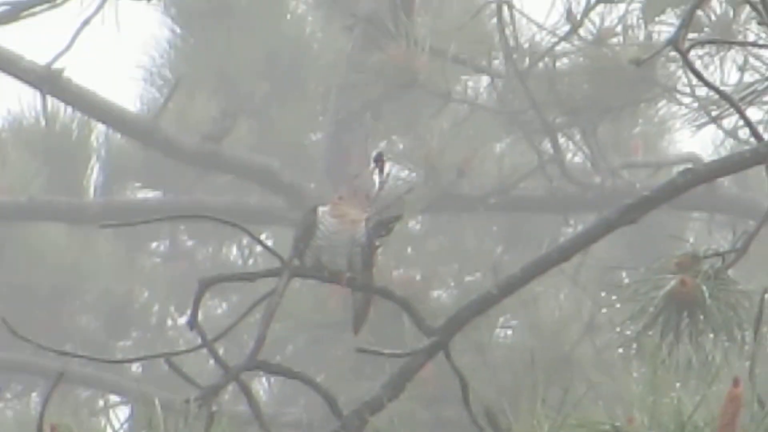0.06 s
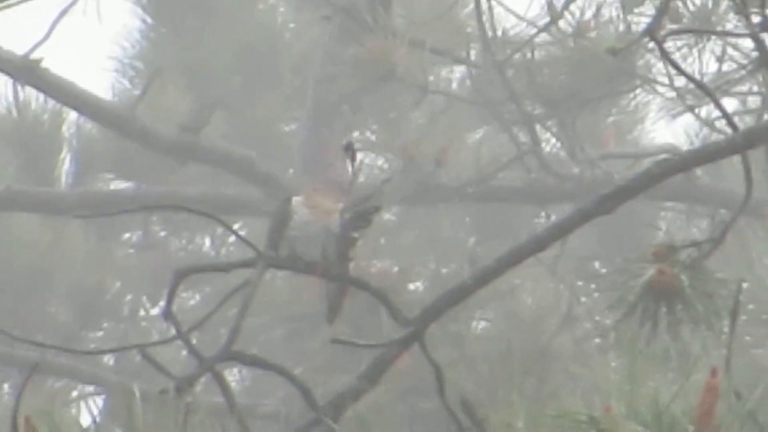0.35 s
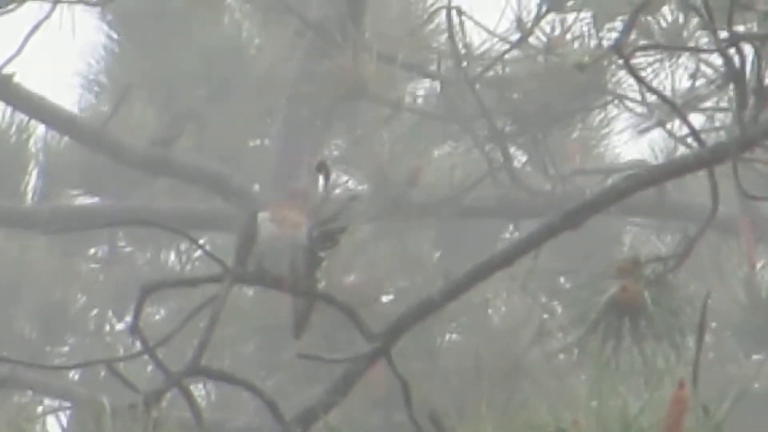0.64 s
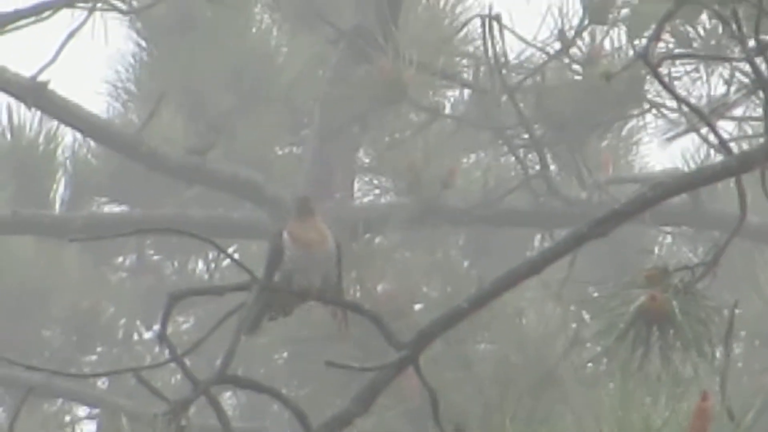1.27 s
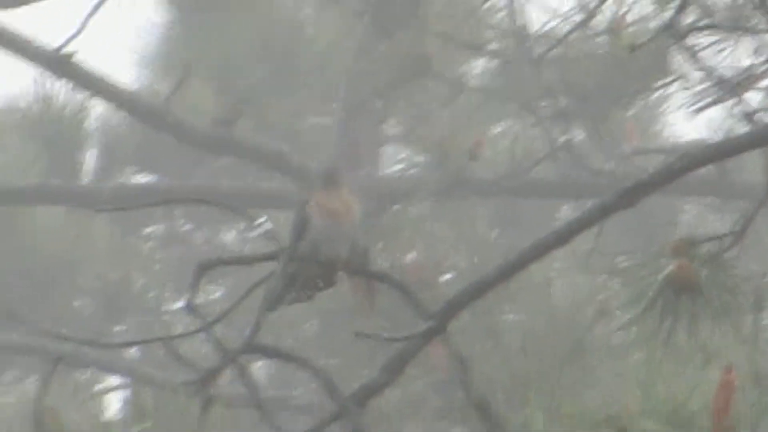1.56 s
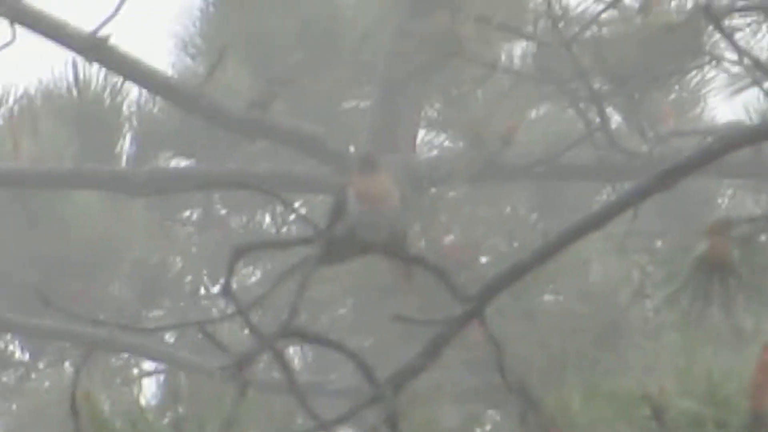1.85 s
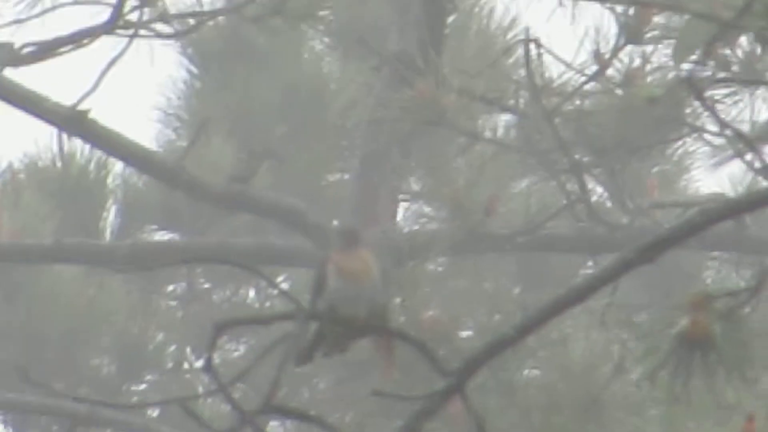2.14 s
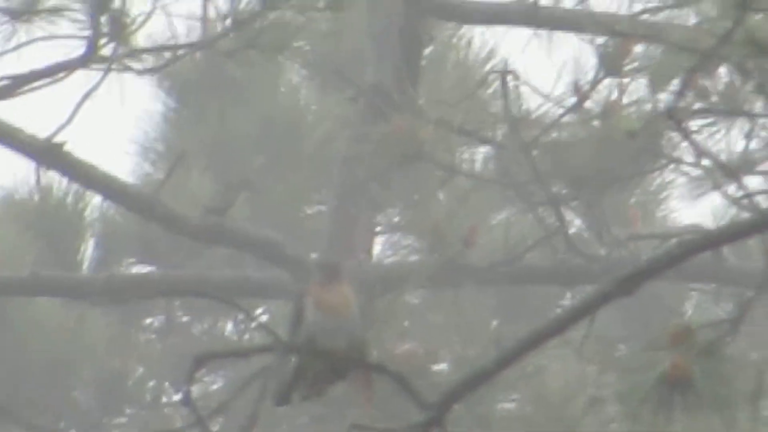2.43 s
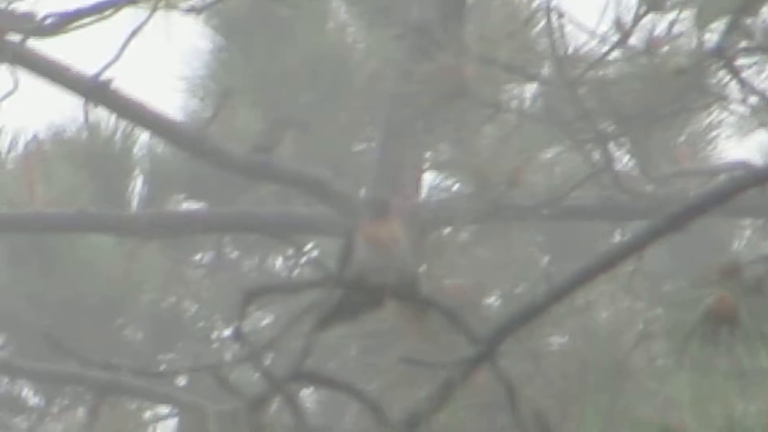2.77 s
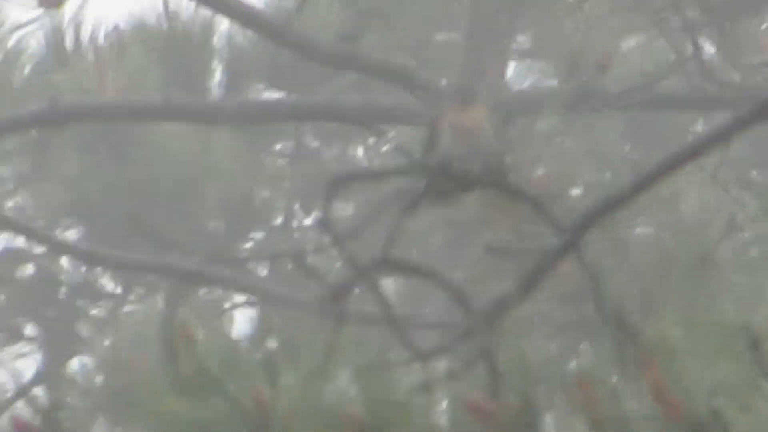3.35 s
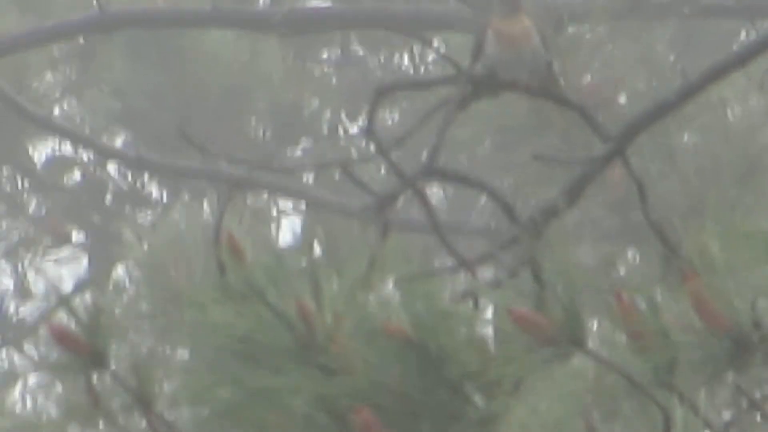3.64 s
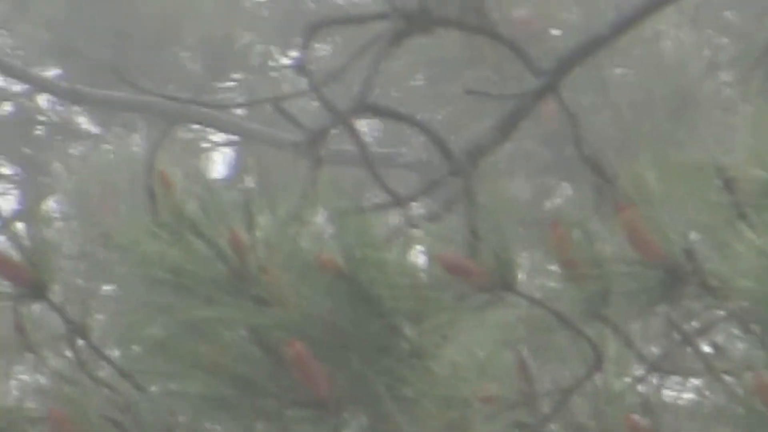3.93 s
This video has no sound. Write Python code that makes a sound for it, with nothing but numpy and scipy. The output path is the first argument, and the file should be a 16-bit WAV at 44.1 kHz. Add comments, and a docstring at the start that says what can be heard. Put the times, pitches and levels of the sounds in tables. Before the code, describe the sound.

Wind buffets the microphone with uneven low rumbles and thumps over a steady hiss in a pine forest. A cuckoo softly calls two notes, and a distant songbird chirps faintly. Near the end comes a sharp handling click, then another cuckoo note.

```python
"""Gusts buffet a camera's two microphone ports in opposite phase, over a hiss and the hollow rush of air.
Among misty pines a cuckoo calls softly in nearly pure tones: a short high note, a longer low one, and
later the start of the next call. A far songbird chirps, and the trees scatter both voices into a faint
tail. A few ticks pass, and one sharp handling click rings the camera's case and briefly ducks the gain."""
import sys
import numpy as np
from scipy import signal
from scipy.fft import rfft, irfft
from scipy.io import wavfile
from scipy.ndimage import uniform_filter1d

SR = 44100
rng = np.random.default_rng(int(sys.argv[2]) if len(sys.argv) > 2 else 0)


def put_to_file(sound):
    """Save the sound as 16-bit audio at rate SR, in the file named by the first command-line argument."""
    columns = np.atleast_2d(sound).T  # one column per channel
    safe = np.clip(columns, -1, 1)
    whole_steps = np.round(safe * 32767)
    wavfile.write(sys.argv[1], SR, whole_steps.astype(np.int16))


N = 176400
T = np.arange(N) / SR
HZ = np.fft.rfftfreq(N, 1 / SR)
CONTACT_S = 0.00047  # rise time of an impact


def amp(db):
    """Amplitude ratio of a level in decibels."""
    return 10 ** (np.asarray(db) / 20)


def unit_rms(x):
    """Normalisation to rms 1."""
    return x / np.sqrt(np.mean(x ** 2) + 1e-20)


def curve(points):
    """Interpolation of a table over log frequency."""
    hz, value = np.transpose(points)
    return np.interp(np.log(HZ + 1), np.log(hz + 1), value)


def add(mix, start, sound):
    """Superposition of a stereo sound on the mix, from a start in seconds."""
    part = mix[:, round(start * SR):][:, :sound.shape[1]]
    part += sound[:, :part.shape[1]]


def white():
    """Spectra of two uncorrelated white noises."""
    return rfft(rng.standard_normal((2, N)))


def coloured(spectra, db):
    """Spectral shaping into noise of rms 1."""
    return unit_rms(irfft(spectra * amp(db), N))


def drift(rate_hz):
    """Low-pass filtering of noise into two random curves of rms 1."""
    return unit_rms(irfft(white() * np.exp(-(HZ / rate_hz) ** 2), N))


def air():
    """Broadband noise swells slowly: an uncorrelated hiss and a hollow rush partly in antiphase."""
    # Each row: time in seconds, hiss level in dB, rush level in dB.
    levels = [(0, -59, -51.5), (.7, -55.5, -48), (1.15, -55, -48), (1.8, -52, -44), (2.6, -51, -44.5),
              (3.35, -49.5, -42), (4, -51.5, -43)]
    # Each row of both spectra: frequency in Hz, relative spectral density in dB.
    hiss_spectrum = [(100, -2), (1200, -3), (2000, -4), (3700, -3), (5000, -7), (7600, -8.5), (8200, -12),
                     (10000, -12.5), (12500, -18), (14000, -23), (15000, -36)]
    rush_spectrum = [(30, -16), (150, -5), (300, -3), (430, -6.5), (550, 0.5), (740, 1), (850, -2.5),
                     (1000, -9.5), (1400, -16), (2500, -25), (6000, -63)]
    # Each row: frequency in Hz, correlation between left and right.
    rush_correlation = [(60, -0.83), (290, -0.86), (640, -0.47), (1400, -0.38)]
    # Each row: frequency in Hz, left minus right level in dB.
    rush_balance = [(200, -1), (400, 0.5), (750, -4.5), (1300, 0.5)]
    times, hiss_db, rush_db = np.transpose(levels)
    left, independent = white()
    correlation = curve(rush_correlation)
    right = correlation * left + np.sqrt(1 - correlation ** 2) * independent
    pan_db = curve(rush_balance) * np.array([[.5], [-.5]])
    rush = coloured(np.array([left, right]), curve(rush_spectrum) + pan_db)
    hiss = coloured(white(), curve(hiss_spectrum))
    return amp(np.interp(T, times, hiss_db)) * hiss + amp(np.interp(T, times, rush_db)) * rush


def forest(sound):
    """Multiple scattering among the trees gives a diffuse, exponentially decaying reverberation."""
    level_db, t60_s, build_s = -13, .9, 0.043
    t = T[:SR]
    tail = rng.standard_normal((2, SR)) * np.exp(-np.log(1000) * t / t60_s) * np.minimum(t / build_s, 1)
    return amp(level_db) * signal.fftconvolve(sound, tail / np.linalg.norm(tail[0]), axes=1)[:, :N]


def songbird():
    """Frequency modulation: thin, distant whistles glide in pitch with a random waver."""
    # Each row: start in seconds, length in seconds, first and last pitch in Hz, level in dB.
    chirps = [(0.091, .045, 5330, 5550, -65), (.22, 0.063, 5200, 4930, -65), (.275, .07, 4350, 4750, -66),
              (1.692, .115, 4860, 5510, -63), (2.075, 0.1, 4900, 5360, -63)]
    out = np.zeros((2, N))
    waver_hz = 130 * drift(rate_hz=120)[0]
    for start, length, from_hz, to_hz, db in chirps:
        progress = np.linspace(0, 1, round(length * SR))
        hz = from_hz + (to_hz - from_hz) * progress + waver_hz[round(start * SR):][:len(progress)]
        whistle = np.sin(2 * np.pi * np.cumsum(hz) / SR)
        add(out, start, amp([[db], [db]]) * np.sin(np.pi * progress) * whistle)
    return out


def ticks():
    """Tiny impacts, perhaps drips from the needles, give quickly damped bursts of band noise."""
    # Each row: start in seconds, level in dB, centre frequency in Hz, decay time in seconds.
    taps = [(0.635, -47, 1830, 0.0061), (1.692, -39, 1420, 0.0043), (1.728, -44, 2800, .002),
            (2.4666, -35, 4200, .0016), (3.0936, -35.5, 1430, 0.0038), (3.198, -42, 1890, 0.0046)]
    half_width_octaves = 0.28
    out, t = np.zeros((2, N)), T[:SR // 10]
    for start, db, hz, decay in taps:
        band = 1 / (1 + (np.log2((HZ + 1) / hz) / half_width_octaves) ** 2)
        grain = unit_rms(irfft(white() * band, N))
        envelope = np.exp(-t / decay) * (1 - np.exp(-t / CONTACT_S))
        add(out, start, amp(db) * envelope * grain[:, :len(t)])
    return out


def wind():
    """Turbulence makes low pressure fluctuations, mostly in antiphase at the two ports."""
    # Each row: time in seconds, wind level in dB.
    gusts = [(0, -29.5), (.06, -17.5), (.13, -27.5), (.17, -26), (.34, -34.5), (.57, -32.5), (.62, -45),
             (.71, -38), (.77, -50), (.83, -22.5), (.9, -20), (.95, -28.5), (1.1, -36), (1.2, -31.5),
             (1.32, -44), (1.42, -28), (1.49, -25.5), (1.56, -29.5), (1.69, -18), (1.74, -39), (1.9, -33.5),
             (1.95, -17.5), (2.03, -26), (2.11, -28.5), (2.24, -29), (2.32, -22), (2.38, -44), (2.55, -48),
             (2.6, -30), (2.64, -34), (2.69, -24), (2.76, -16), (2.81, -29.5), (2.95, -31), (3.04, -20),
             (3.12, -26.5), (3.18, -46), (3.3, -46), (3.37, -23.5), (3.52, -47.5), (3.84, -48), (3.88, -32),
             (3.92, -43), (3.99, -20)]
    # Each row: frequency in Hz, relative spectral density in dB.
    spectrum = [(10, -7), (30, 1), (70, 0), (125, -8.5), (200, -23), (350, -31), (700, -54), (2000, -80)]
    common_db = -14.5
    flow = coloured(white(), curve(spectrum))
    local_rms = np.sqrt(uniform_filter1d(flow ** 2, size=2600, axis=1) + 0.026)
    opposed, common = amp(np.interp(T, *np.transpose(gusts))) * flow / local_rms
    return np.array([opposed, -opposed]) + amp(common_db) * common


def thumps():
    """A passing eddy is a pressure pulse flanked by suction, of opposite sign at the two ports."""
    # Each row: time in seconds, peak level at the left port in dB, width in seconds.
    eddies = [(.057, -11, 0.0024), (.079, -17.5, 0.0019), (0.125, -7, 0.0032), (0.384, -16, 0.0043),
              (0.865, -10.5, 0.0026), (0.896, -10, 0.0026), (0.911, -1.5, 0.0014), (1.481, -18.5, 0.0037),
              (1.619, -23, 0.0041), (1.696, -6, 0.0056), (1.935, -14.5, 0.0026), (1.997, -9, 0.0033),
              (2.072, -15, 0.004), (2.146, -8, 0.003), (2.303, -12.5, 0.0019), (2.695, -9, 0.0037),
              (2.756, -6.5, 0.0023), (2.883, -18, 0.0035), (3.363, -23, 0.0046), (3.968, -14.5, 0.0016)]
    tip_share, right_db = 0.45, -4
    out = np.zeros(N)
    for time, db, width in eddies:
        offset_sq = ((T - time) / width) ** 2
        rounded = (1 - offset_sq) * np.exp(-offset_sq / 2)
        sharp_tip = (1 - offset_sq) / (1 + offset_sq) ** 3
        out += amp(db) * ((1 - tip_share) * rounded + tip_share * sharp_tip)
    return out * np.array([[1], [-amp(right_db)]])


def click():
    """Impulse excitation: a hard snap and its rebound ring the damped modes of the camera's case."""
    # Each row: start in seconds, gain in dB.
    impacts = [(3.424, 1), (3.4263, -16.5)]
    # Each row: frequency in Hz, left and right relative level in dB, time to fall 60 dB in seconds.
    case_modes = [(135, -38, -32.5, 0.02), (376, -23, -17, .012), (750, -14, -13, 0.043),
                  (1410, -24, -13.5, 0.019), (2066, -8.5, -16, 0.014), (2350, -4.5, -7.5, 0.0099),
                  (2780, -16, -6, 0.011), (3402, -21.5, -7.5, 0.016), (5090, -31, -23.5, 0.018),
                  (5790, -20, -14, 0.0081), (6920, -25, -13, 0.008), (7960, -34, -14.5, 0.0083),
                  (8760, -31, -15.5, 0.0074)]
    rock_rad, rock_below_hz = 2.35, 1700  # low modes rock the case: the ports move against each other
    crack_db, crack_s, crack_hz = [[-15.5], [-12.5]], 0.0011, 8100
    out, t = np.zeros((2, N)), T[:SR // 10]
    ring = np.zeros((2, len(t)))
    for k, (hz, left_db, right_db, t60) in enumerate(case_modes):
        lag = np.array([[0], [rock_rad * (hz < rock_below_hz)]])
        envelope = amp([[left_db], [right_db]]) * np.exp(-np.log(1000) * t / t60)
        ring += (-1) ** k * envelope * np.sin(2 * np.pi * hz * t - lag)
    ring *= 1 - np.exp(-t / CONTACT_S)
    for start, db in impacts:
        grit = signal.lfilter(*signal.butter(2, crack_hz, fs=SR), rng.standard_normal((2, len(t))))
        crack = amp(crack_db) * np.exp(-t / crack_s) * grit
        add(out, start, amp(db) * (ring + crack))
    return out


def cuckoo():
    """Nearly sinusoidal oscillation: each hoot scoops up to pitch, holds and drops away."""
    # Each row: start in seconds, length in seconds, top pitch in Hz, level in dB, left minus right in dB.
    notes = [(0.786, 0.085, 718.6, -36.5, 4.5), (1.055, 0.15, 590.6, -36.5, -0.5),
             (3.93, 0.11, 717.5, -32, 4)]
    scoop_depth, droop_depth, waver_depth = 0.044, .05, 0.0037  # shares of the pitch
    scoop_share, attack_share = 0.28, .17  # shares of the note's length
    droop_s, release_s = 0.0072, 0.017
    flutter_db, octave_db, left_lead_rad = 1.2, -36, 0.17
    out = np.zeros((2, N))
    waver, flutter = drift(rate_hz=58)
    for start, length, top_hz, db, pan_db in notes:
        t = np.arange(0, length, 1 / SR)
        at = (round(start * SR) + np.arange(len(t))) % N
        scoop = scoop_depth * np.exp(-t / (scoop_share * length))
        droop = droop_depth * np.exp((t - length) / droop_s)
        hz = top_hz * (1 - scoop - droop + waver_depth * waver[at])
        phase = 2 * np.pi * np.cumsum(hz) / SR + np.array([[left_lead_rad], [0]])
        tone = np.sin(phase) + amp(octave_db) * np.sin(2 * phase)
        attack = 1 - np.exp(-t / (attack_share * length))
        release = np.sin(np.pi / 2 * np.minimum((length - t) / release_s, 1)) ** 2
        gain = amp(db + flutter_db * flutter[at] + pan_db * np.array([[.5], [-.5]]))
        add(out, start, gain * attack * release * tone)
    return out


def scene():
    """Superposition of the birds, their reverberation, the moving air and the small impacts."""
    birds = cuckoo() + songbird()
    return birds + forest(birds) + wind() + thumps() + air() + ticks() + click()


def record(dry):
    """Compression ducks the gain after treble peaks; notches, clipping and a band limit follow."""
    # The camera's notch filters. Each row: centre frequency in Hz, width in Hz.
    notches = [(3940, 340), (7870, 180)]
    threshold_db, duck_share, recover_db_per_s = -20, .25, 85
    treble_hz, band_limit_hz = 1000, 15200
    treble = signal.sosfilt(signal.butter(2, treble_hz, "high", fs=SR, output="sos"), dry)
    power = signal.lfilter(np.ones(128) / 128, 1, (treble ** 2).mean(0))
    excess_db = np.maximum(10 * np.log10(power + 1e-12) - threshold_db, 0)
    recovery_db = T * recover_db_per_s
    held_db = np.maximum.accumulate(excess_db + recovery_db) - recovery_db
    duck_db = duck_share * signal.lfilter(np.ones(400) / 400, 1, held_db)
    x = dry / amp(duck_db)
    for hz, width in notches:
        x = signal.lfilter(*signal.iirnotch(hz, hz / width, SR), x)
    lowpass = signal.firwin(255, band_limit_hz, window=("kaiser", 7), fs=SR)
    return signal.oaconvolve(np.clip(x, -1, 1), lowpass[None], "same")


dry = scene()
out = record(dry)
put_to_file(out)
```